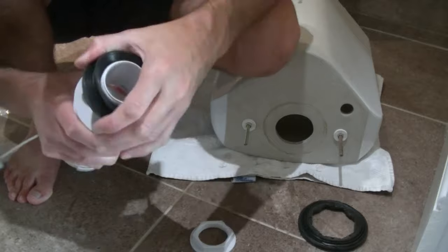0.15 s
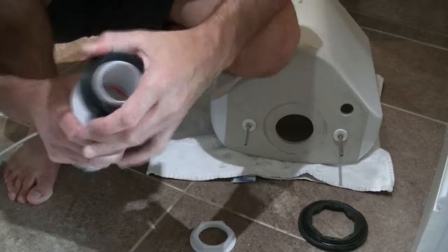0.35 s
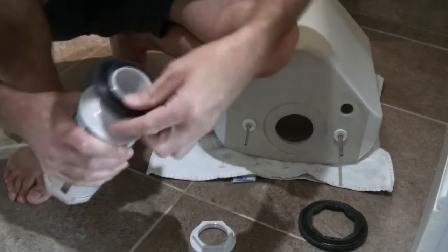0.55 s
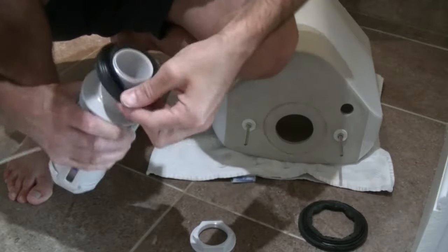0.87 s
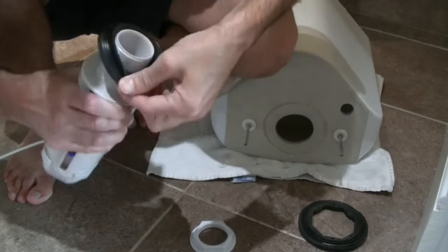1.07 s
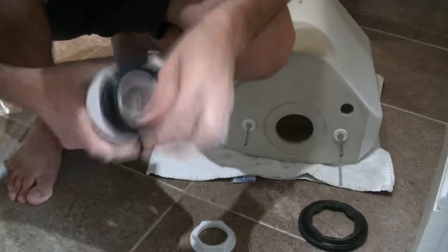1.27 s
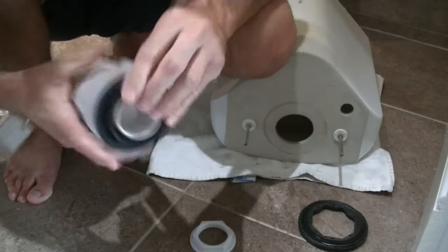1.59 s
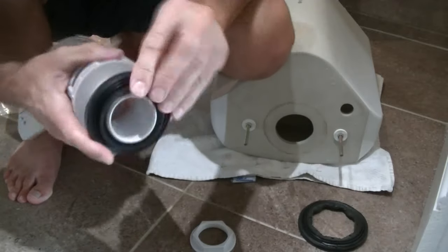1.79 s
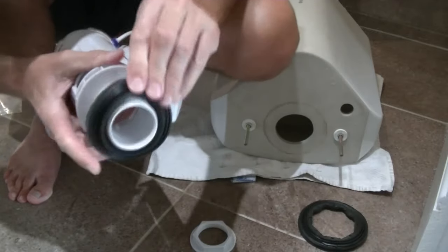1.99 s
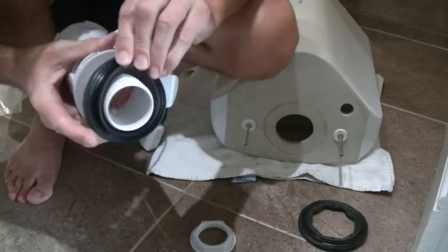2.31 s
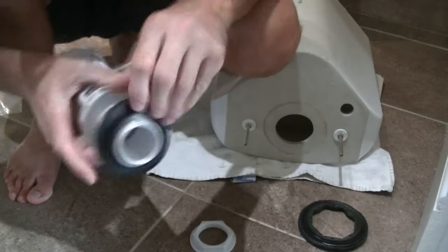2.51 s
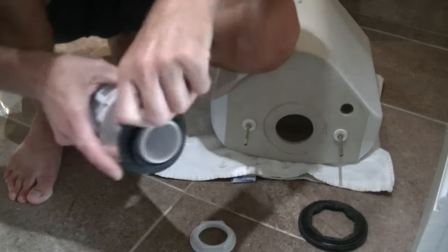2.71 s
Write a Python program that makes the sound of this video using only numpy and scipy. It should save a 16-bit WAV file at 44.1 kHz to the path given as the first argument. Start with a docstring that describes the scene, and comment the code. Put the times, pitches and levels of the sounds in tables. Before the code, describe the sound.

A rubber ring scrapes over a hollow plastic neck, starting with a sharp scratch at 0 s, then fainter rubs. Stronger gritty strokes and clacks come around 0.5 to 0.75 s, then a near lull until 1.15 s. Bright clicks and scrapes follow in bursts until 2.3 s, quiet faint ticks, then a last burst at 2.55 s. Close microphone, small tiled room, short reverberation, faint hum and hiss.

```python
"""Fingers work a rubber ring onto the threaded neck of a hollow plastic part, in a small tiled room near a camera.
From the start the ring and fingers scrape over the thread in short strokes: noise roughened by tiny slips.
Loose plastic parts soon click as well, mostly at the start of a stroke or during it, each a noise crack and a
blurred sine; both ring the hollow body. Four times the holding hand shifts its grip: a soft rumble of filtered noise.
Throughout, hard walls draw every sound out with noise tails, over a faint room hum and hiss of shaped noise."""
import sys
import numpy as np
from scipy import signal
from scipy.fft import rfft, irfft, next_fast_len
from scipy.io import wavfile

SR = 44100
rng = np.random.default_rng(int(sys.argv[2]) if len(sys.argv) > 2 else 0)


def transcribe(u):
    """Save the signal u as a 16-bit wav file named by the first command-line argument.

    u: samples, shape (n,) or (channels, n), limited to [-1, 1]; the rate is SR.
    q: integer samples, one column per channel.
    """
    v = np.clip(np.atleast_2d(u).T, -1, 1)
    q = np.round(v * 32767).astype(np.int16)
    wavfile.write(sys.argv[1], SR, q)


N = 125685

# Scraping strokes. Levels are those of the middle range; the five colours are set against it:
# start_s, length_s, start_level_db, end_level_db, thud_db, hollow_db, shell_db, treble_db, fizz_db
STROKES = [(-0.005, 0.044, -7, -25.5, 0, -8.5, -5, -3, 2), (0.027, 0.13, -31, -49.5, -4, 8, -9, -1, -9),
           (0.16, 0.015, -33, -44, 0, 10, 0, 1, -8), (0.173, 0.067, -28, -39.5, 6, 8.5, 8, -1, -21),
           (0.243, 0.18, -40.5, -60, 16.5, 5.5, 6.5, 7.5, 3), (0.41, 0.027, -47.5, -45, 18, 5, 9.5, 1, 14),
           (0.438, 0.035, -27, -36.5, 4, 7, 4, 0.5, -8), (0.481, 0.1, -22, -27, 5, 2.5, -1, 0.5, -8),
           (0.64, 0.093, -26, -29.5, -1.5, 1, 0.5, -1, -21),
           (0.715, 0.099, -34, -33, 13, -2.5, 8.5, -3, -8), (0.889, 0.042, -40, -56.5, 20, 9, 3, -5, -14),
           (0.958, 0.12, -52, -55, 13, -1, 2, -8, -6), (1.049, 0.039, -39, -42, 13.5, 10, 9.5, -6, -11),
           (1.121, 0.043, -31, -40, 10, -2, -9, 1, -2), (1.166, 0.04, -22.5, -30, -6, -4, 1, -5, 15.5),
           (1.21, 0.12, -30, -25, 6, 8, 8, 1.5, -8), (1.387, 0.1, -17, -36, 4, -0.5, 4.5, 3.5, 0),
           (1.49, 0.078, -32.5, -21.5, 13, 1, 4.5, 5.5, -3),
           (1.683, 0.061, -25, -31.5, 9.5, 1.5, -3, 3.5, -5),
           (1.751, 0.045, -23.5, -30.5, 13, -3.5, 2, 2.5, -3),
           (1.815, 0.036, -26.5, -30.5, -10, -2.5, -16, -1, -12),
           (1.99, 0.073, -32.5, -34.5, 0, 4, -8, 1.5, 0), (2.068, 0.072, -21.5, -29.5, 5, -4.5, -8, 6, 7),
           (2.138, 0.13, -20.5, -29.5, 1.5, 3.5, -4.5, 1.5, -16),
           (2.352, 0.023, -44, -49.5, 7, -19, 10, 6.5, -2), (2.411, 0.12, -51, -49.5, 14.5, 0.5, -1, 3, 2),
           (2.527, 0.026, -51.5, -30, 20, 11.5, 10, 5, -4), (2.558, 0.095, -20.5, -32.5, 7, 6.5, 1.5, 5, 7)]
RISE_S, FALL_S = 0.0061, 0.0053  # fade in from the start, fade out after the length
SLIPS_PER_S, SLIP_SPREAD_DB, SLIP_T60_S = 220, 7.5, 0.013
HISS_SHARE = 0.49  # steady part of the scrape; the rest is slips
OWN_SHARE = 0.54  # part of the slips that shakes a single range; the rest shakes all

# Plastic clicks; level is before the crack and ring trims, colours are against the middle range:
# start_s, level_db, pitch_hz, thud_db, hollow_db, shell_db, treble_db, fizz_db
CLICKS = [(0.172, -18, 1890, 7, 19, 21, -6, -4), (0.2158, -9, 1840, 0, -1, -12, -2, -8),
          (0.4394, -14.5, 1870, 0, 13, 15, 9, 6), (0.4515, -12.5, 1740, 0, -8, 12, 0, -8),
          (0.4819, 3, 2860, 7, -3, -1, 4.5, 10), (0.5249, -1.5, 3750, -6, 11, -8, -1, 0),
          (0.539, 5, 3745, 12.5, 5.5, 9, 4, -9), (0.647, -2, 3670, -1, 9.5, -17, 16.5, 8),
          (0.6714, -10, 3540, -4, -6, 0, -3, 3), (0.7272, -14.5, 3640, 13, -7, 26.5, -10, -10),
          (1.061, -19.5, 4080, 6, -7, 2, -4, -3), (1.128, -22.5, 2900, 0, 0, -8, 29.5, 24),
          (1.1639, -1.5, 4820, 2, 5, 5, 17.5, 19), (1.1894, -3, 3830, -12, 8, 15.5, -7, -4),
          (1.213, -8, 2950, -22, 0, 5, -3, 4), (1.2296, -5.5, 5830, -12, -9, 22, 17, 16),
          (1.2407, 5, 4290, 1, -4, 9, 0, 8), (1.2723, 0.5, 3830, 3, 12, -4, -3, 6),
          (1.3911, -5.5, 1740, 8, -8, 13, 18, 25), (1.5346, -2.5, 3320, 14, 14.5, 9, 15.5, 3),
          (1.5535, 1, 4090, 0, -11, 8.5, 7, 3), (1.6897, -18, 3070, 2, 17, -6, 1, 5),
          (1.7095, -2, 4210, 6, 3, 12.5, -2, 6), (1.7323, -6, 3280, 13, -3, -12, 10, 6),
          (1.7555, -20, 2050, -2, -5, -2, 29, 16), (1.8192, -6.5, 3500, -12, 12.5, 7, 11, -12),
          (1.9904, 1.5, 3460, -24, 9, -26, 9.5, -9), (2.0266, 2.5, 4945, 4, 4.5, -14, 16.5, 24),
          (2.063, -12, 4830, -18, 9, 4, 7, 8), (2.0751, -0.5, 2585, 17.5, 5, 15, 8, 21),
          (2.1441, -1, 4360, 4, 12.5, 3, 15, 18.5), (2.2252, -8, 1830, -18, 12, 3, 14, -1),
          (2.4141, -22.5, 2170, -3, 15, 9, -9, -1), (2.4608, -26, 3480, 0, 1, 0, 9, -5),
          (2.4906, -22.5, 2440, 9, 2, 0, -5, 4), (2.5101, -24.5, 3760, 0, 3, 9, 18.5, 6),
          (2.5556, 1, 4340, 1, 2, 14.5, 10.5, -8), (2.5772, 3, 2570, 13, -8, -8, -9, -1),
          (2.592, -0.5, 4100, -8, 15, 1, 5, 8), (2.6282, -2.5, 4360, -13, 5, -10, -4, 6)]
CLICK_RISE_S, FIZZ_RISE_S = 0.0014, 0.00071
CRACK_T60_S, FIZZ_T60_S, RING_T60_S = 0.012, 0.0091, 0.014
CRACK_DB, RING_DB, RING_BLUR_HZ = -10, -4, 40
SING_DB, SING_WIDTH_HZ = 11, 200  # resonance that the strokes keep ringing at a click's pitch
NECK_HZ, NECK_WIDTH_HZ, NECK_DB = 1745, 65, 12  # air in the open neck

# Grip shifts of the holding hand: start_s, length_s, level_db
GRIPS = [(0.656, 0.11, -65.5), (1.4, 0.12, -64.5), (2.068, 0.25, -56.5), (2.547, 0.084, -63)]
GRIP_HZ, GRIP_WIDTH_HZ = 342, 270

# Broad colour of the hollow body: frequency_hz, density_db (per Hz)
BODY_COLOUR = [(120, -64), (230, -43), (400, -29), (774, -26), (1350, -12.5), (2140, -5), (3700, -0.5),
               (6020, -13.5), (8560, -17.5), (16000, -36.5)]
# Resonances of the hollow body: frequency_hz, width_hz, lift_db
BODY_MODES = [(1740, 110, -5), (1897, 190, 6), (2847, 250, 3.5), (3754, 220, 3), (4270, 170, 5.5),
              (5050, 1480, 5.5), (7150, 110, 7.5), (8700, 1120, 3.5)]
# Borders between the thud, hollow, shell, middle, treble and fizz ranges, in Hz
RANGE_EDGES_HZ = [900, 2200, 3300, 5600, 10000]
RING_FROM_HZ = 700  # ringing parts are thinned out below this

# Decay of the tiled walls: frequency_hz, t60_s
WALL_DECAY = [(300, 0.46), (2000, 0.35), (5500, 0.36), (14000, 0.38)]
# Tone of the wall sound: frequency_hz, gain_db
WALL_COLOUR = [(300, -4), (2000, -1), (6000, -3), (15000, -9.5)]
# Stereo width of the wall sound: frequency_hz, side_over_mid_db
WALL_SIDE = [(60, -12), (180, -7), (550, -16.5), (1650, -12.5), (4970, -6.5), (15000, 2)]
WALL_DB, WALL_START_S, WALL_BUILD_S = -1.5, 0.003, 0.0014

# Level balance of the two microphone ports: frequency_hz, left_over_right_db
PORT_LEFT_DB = [(200, 0), (700, 3), (2500, 0.5), (6000, 1.5), (12000, 0)]
# Phase by which the left port leads: frequency_hz, lead_rad
PORT_LEAD = [(500, 0.27), (5000, 0.57), (7000, 1), (9000, -1.48), (15000, -1.6)]

# Broad colour of the room air: frequency_hz, density_db (per Hz)
AIR_COLOUR = [(25, -30), (90, -12), (250, -9.5), (760, -15.5), (2000, -10), (6000, -14), (16000, -29.5)]
# Level of the room air over time: time_s, level_db
AIR_LEVEL = [(0, -56.5), (2.5, -58), (2.75, -60.5)]
# Stereo width of the room air: frequency_hz, side_over_mid_db
AIR_SIDE = [(25, -9), (60, -6), (180, 6.5), (500, -1), (15000, -2.5)]
HUM_HZ, HUM_WIDTH_HZ, HUM_DB = 652.4, 7.2, 17
TOP_HZ = 15900  # band limit of the camera


def scraping():
    """Uneven slips, each a tiny burst, over a hiss; some slips shake all ranges, some only one."""
    t = np.arange(N) / SR
    # row 0 shakes all ranges, rows 1 to 6 one range each
    when = rng.random((7, N)) < SLIPS_PER_S / SR
    size = amp(SLIP_SPREAD_DB * np.clip(rng.standard_normal((7, N)), -2, 2))
    decay_per_sample = amp(-60 / (SLIP_T60_S * SR))
    slips = unit(signal.lfilter([1], [1, -decay_per_sample], when * size))
    mixed_slips = OWN_SHARE * slips[1:] + (1 - OWN_SHARE) * slips[0]
    roughness = unit(HISS_SHARE + (1 - HISS_SHARE) * mixed_slips)
    grit = rng.standard_normal(N) * roughness

    push = np.zeros((6, N))
    for start, length, start_db, end_db, *colour in STROKES:
        age = t - start
        fade_in = np.clip(age / RISE_S, 0, 1)
        fade_out = np.clip((length - age) / FALL_S + 1, 0, 1)
        level_db = start_db + (end_db - start_db) * np.clip(age / length, 0, 1)
        push += range_gains(*colour) * fade_in * fade_out * amp(level_db)

    scrape = rung(push * grit)
    sung = singing(push[3] * grit[3])  # driven by the middle range
    neck_air = neck(push[1] * rng.standard_normal(N))  # driven at the hollow range's level
    return scrape + sung + neck_air


def clicks():
    """Each click is a short noise crack through the body and a brief, blurred ring at its own pitch."""
    t = np.arange(SR // 20) / SR
    push, ring = np.zeros((6, N + SR)), np.zeros(N + SR)
    # the fizz range has its own rise and decay
    crack_rise = np.array([[CLICK_RISE_S]] * 5 + [[FIZZ_RISE_S]])
    crack_t60 = np.array([[CRACK_T60_S]] * 5 + [[FIZZ_T60_S]])
    crack_shape = (1 - np.exp(-t / crack_rise)) * amp(-60 * t / crack_t60)
    ring_shape = (1 - np.exp(-t / CLICK_RISE_S)) * amp(-60 * t / RING_T60_S)

    for start, level_db, pitch, *colour in CLICKS:
        crack, drift = rng.standard_normal((2, len(t)))
        first = round(start * SR)
        at = slice(first, first + len(t))
        push[:, at] += range_gains(*colour) * amp(level_db + CRACK_DB) * crack_shape * crack
        # a random walk of the phase blurs the pitch
        blur = np.sqrt(2 * np.pi * RING_BLUR_HZ / SR) * np.cumsum(drift)
        ring[at] += amp(level_db + RING_DB) * ring_shape * np.sin(2 * np.pi * pitch * t + blur)
    return rung(push[:, :N]) + without_bass(ring[:N]) + neck(push[1, :N])


def rung(push):
    """The hollow body rings to six rows of excitation, each kept to its own frequency range."""
    def response(hz):
        low_passes = [1 / (1 + (hz / edge) ** 6) for edge in RANGE_EDGES_HZ]
        below = np.array([0 * hz] + low_passes + [1 + 0 * hz])
        ranges = np.diff(below, axis=0)
        return body(hz) * ranges
    return filtered(push, response).sum(0)


def body(hz):
    """Causal colour of the hollow part, about mean power 1: a broad shape lifted at its modes."""
    db = along(BODY_COLOUR, hz)
    for centre, width, lift_db in BODY_MODES:
        db = db + lift_db / (1 + (2 * (hz - centre) / width) ** 2)
    gain = amp(db) / np.sqrt(np.mean(amp(db) ** 2))
    # minimum phase: fold the cepstrum onto positive times
    cepstrum = irfft(np.log(gain + 1e-6))
    index = np.arange(len(cepstrum))
    fold = np.clip(2 * np.sign(len(cepstrum) // 2 - index), 0, 2) - (index == 0)
    return np.exp(rfft(cepstrum * fold))


def range_gains(thud_db, hollow_db, shell_db, treble_db, fizz_db):
    """Gains of the six ranges, against the middle one."""
    return amp([[thud_db], [hollow_db], [shell_db], [0], [treble_db], [fizz_db]])


def singing(grit):
    """From each click to the next the scraping rings a resonance at the pitch of the earlier click."""
    out, silence = np.zeros(N + SR), np.zeros(SR // 20)
    edges = [round(row[0] * SR) for row in CLICKS] + [N]
    for row, first, last in zip(CLICKS, edges, edges[1:]):
        pitch = row[2]
        peak = signal.iirpeak(pitch, pitch / SING_WIDTH_HZ, SR)
        # the silence lets the resonance die away past the next click
        part = signal.lfilter(*peak, np.r_[grit[first:last], silence])
        out[first:first + len(part)] += part
    return amp(SING_DB) * without_bass(out[:N])


def neck(push):
    """The air in the open neck rings at one steady pitch."""
    peak = signal.iirpeak(NECK_HZ, NECK_HZ / NECK_WIDTH_HZ, SR)
    return amp(NECK_DB) * without_bass(signal.lfilter(*peak, push))


def without_bass(x):
    """A small ringing part radiates little low sound."""
    return signal.sosfilt(signal.butter(4, RING_FROM_HZ, "high", fs=SR, output="sos"), x)


def grip():
    """A soft low rumble of the palm on the body: noise through a broad resonance twice, in swells."""
    t = np.arange(N) / SR
    band = signal.iirpeak(GRIP_HZ, GRIP_HZ / GRIP_WIDTH_HZ, SR)
    once = signal.lfilter(*band, rng.standard_normal(N))
    rumble = unit(signal.lfilter(*band, once))
    level = np.zeros(N)
    for start, length, level_db in GRIPS:
        progress = np.clip((t - start) / length, 0, 1)
        level += amp(level_db) * np.sqrt(np.abs(np.sin(np.pi * progress)))
    return rumble * level


def walls(x, size=4096):
    """The tiles answer with a dense tail, drawn afresh for each short block of sound; the bass lasts longest."""
    out = np.zeros((2, N + SR))
    for first in range(0, N, size):
        hz, t, spectrum = signal.stft(rng.standard_normal((2, SR // 2)), SR, nperseg=128)
        decay = amp(-60 * t / along(WALL_DECAY, hz)[:, None])
        tail = signal.istft(spectrum * decay, SR, nperseg=128)[1]
        age = np.arange(tail.shape[1]) / SR
        tail = tail / np.linalg.norm(tail[0]) * (1 - np.exp(-age / WALL_BUILD_S))
        wet = signal.fftconvolve(x[None, first:first + size], tail, axes=1)
        at = first + round(WALL_START_S * SR)
        out[:, at:at + wet.shape[1]] += wet

    def response(hz):
        return amp(along(WALL_COLOUR, hz) + [0 * hz, along(WALL_SIDE, hz)])
    mid, side = filtered(out[:, :N], response)
    return np.array([mid + side, mid - side])


def air():
    """Faint low murmur of the building, a blurred hum and hiss: noise with a narrow peak at the hum."""
    def response(hz):
        hum_db = HUM_DB / (1 + (2 * (hz - HUM_HZ) / HUM_WIDTH_HZ) ** 2)
        return amp(along(AIR_COLOUR, hz) + hum_db + [0 * hz, along(AIR_SIDE, hz)])
    mid, side = unit(filtered(rng.standard_normal((2, N)), response))
    level_db = np.interp(np.arange(N) / SR, *np.transpose(AIR_LEVEL))
    return amp(level_db) * np.array([mid + side, mid - side])


def amp(db):
    """dB to gain."""
    return 10 ** (np.asarray(db) / 20)


def unit(x):
    """Scaled to rms 1 over all rows together."""
    return x / np.sqrt(np.mean(x ** 2) + 1e-20)


def along(points, hz):
    """Value at hz between (Hz, value) points, on a log frequency axis."""
    f, v = np.transpose(points)
    return np.interp(np.log(hz + 1), np.log(f + 1), v)


def filtered(x, response):
    """x shaped in the spectrum by a complex response of frequency."""
    m = 2 * next_fast_len(N // 2 + SR // 4, real=True)
    return irfft(rfft(x, m) * response(np.fft.rfftfreq(m, 1 / SR)), m)[..., :N]


def scene():
    """Direct sound meets the two ports with a small phase offset; the ports differ a little in level."""
    dry = scraping() + clicks() + grip()
    half = np.array([[0.5], [-0.5]])  # left and right share each difference
    direct = filtered(dry, lambda hz: np.exp(1j * half * along(PORT_LEAD, hz)))
    sound = direct + amp(WALL_DB) * walls(dry)
    return filtered(sound, lambda hz: amp(half * along(PORT_LEFT_DB, hz))) + air()


def record(dry):
    """The camera keeps nothing above its band limit."""
    return filtered(dry, lambda hz: hz < TOP_HZ)


dry = scene()
out = record(dry)
transcribe(out)
```